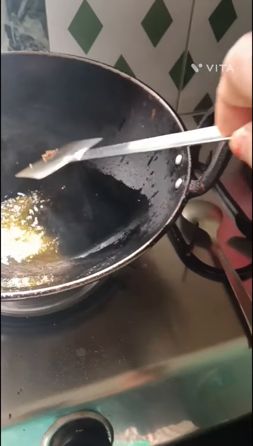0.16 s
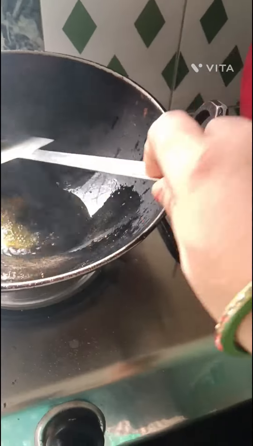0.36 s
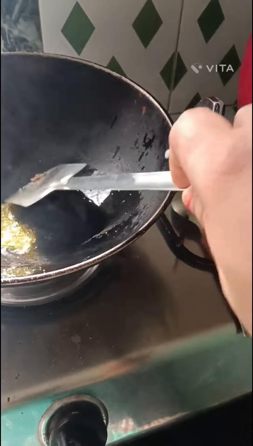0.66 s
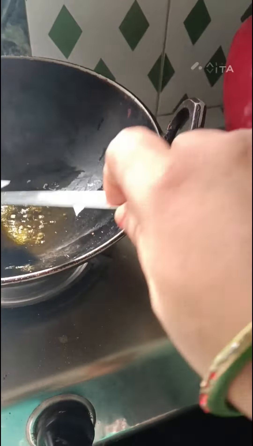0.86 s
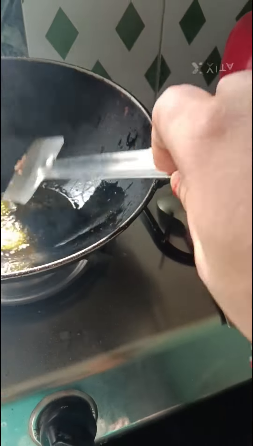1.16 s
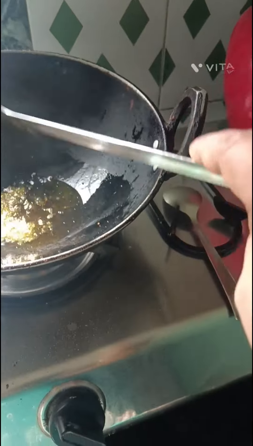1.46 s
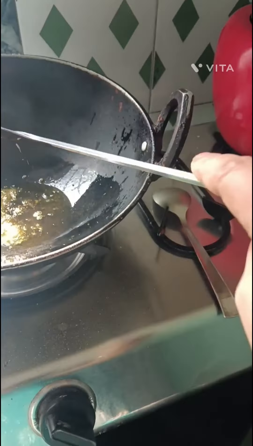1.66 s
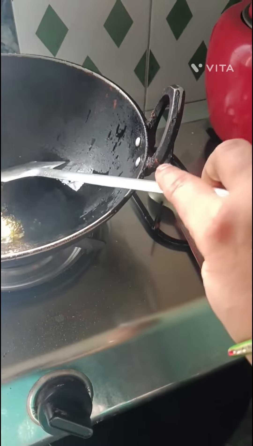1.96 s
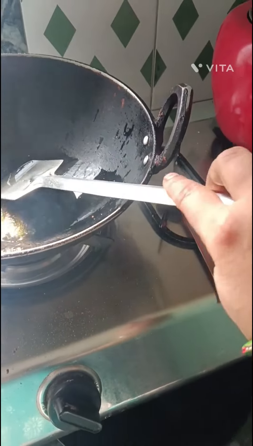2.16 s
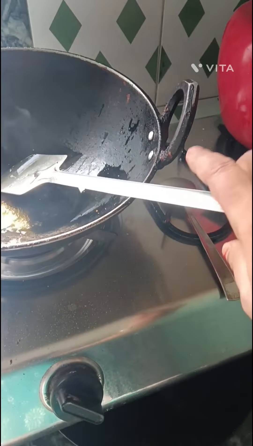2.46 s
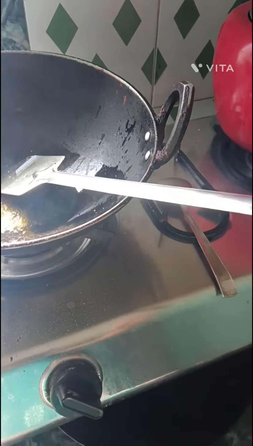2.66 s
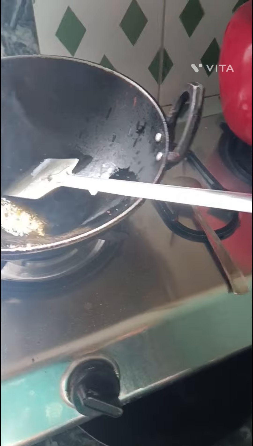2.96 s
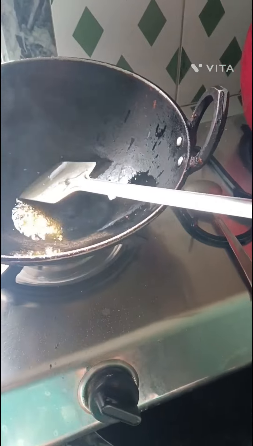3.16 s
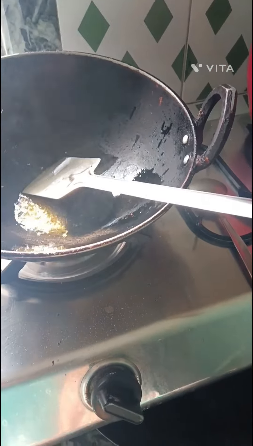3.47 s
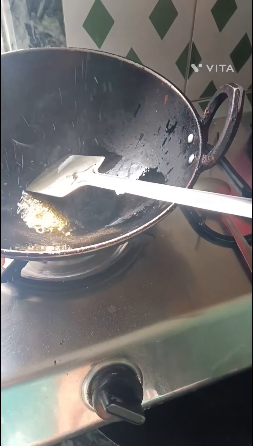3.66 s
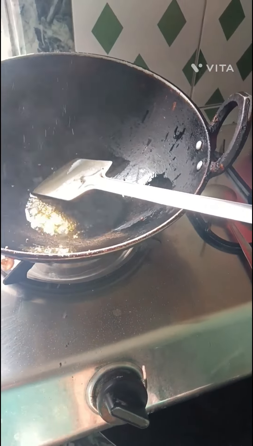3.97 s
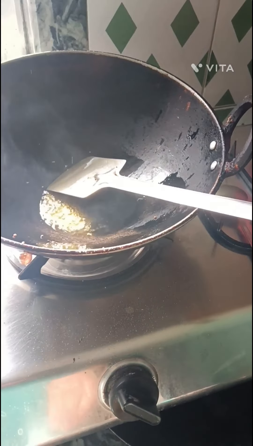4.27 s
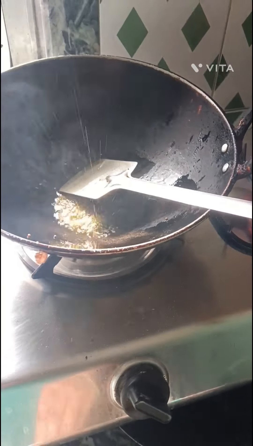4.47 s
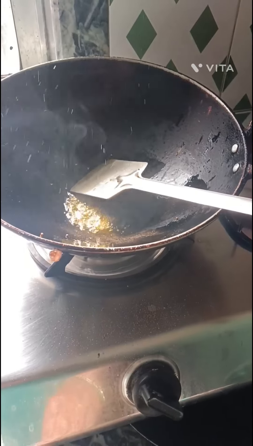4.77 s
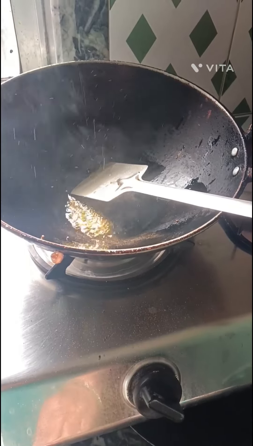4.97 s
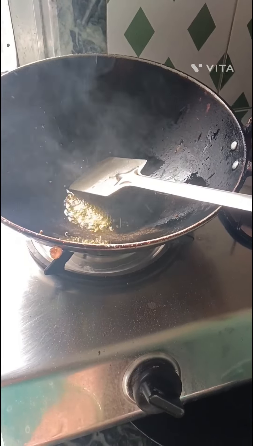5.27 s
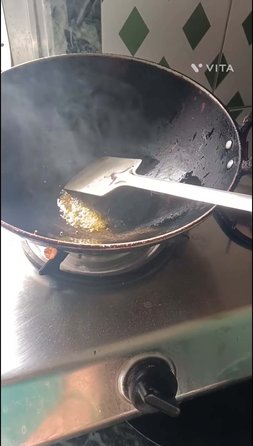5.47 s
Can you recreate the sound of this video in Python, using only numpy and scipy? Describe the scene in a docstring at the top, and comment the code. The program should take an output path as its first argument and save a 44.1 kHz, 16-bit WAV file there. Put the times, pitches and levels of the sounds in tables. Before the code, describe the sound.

A metal spatula knocks and scrapes in a pan, then seeds crackle ever more densely in hot oil with sharp pops and sizzle.

```python
"""In a tiled kitchen, seeds burst in hot oil in a steel pan: each pop is a damped bubble tone and a noise crack.
A spatula knocks, scrapes and squeals early on: noise through steel modes, and a wavering tone.
Later the pops crowd over a sizzle of clicks and small bubbles; the nearest puff air on a phone's right port.
A stove murmurs and rumbles as shaped noise; the tiles add echoes and a noise tail; gain control ducks after peaks."""
import sys
import numpy as np
from scipy import signal
from scipy.fft import rfft, irfft, next_fast_len
from scipy.io import wavfile
from scipy.ndimage import minimum_filter1d

SR = 44100
rng = np.random.default_rng(int(sys.argv[2]) if len(sys.argv) > 2 else 0)


def to_wav(s):
    """Save 16-bit WAV."""
    ch = np.atleast_2d(s).T  # columns
    pcm = np.round(np.clip(ch, -1, 1) * 32767)  # PCM
    wavfile.write(sys.argv[1], SR, pcm.astype(np.int16))


N = 247790

# bursting seeds: (time [s], bubble peak [dB], bubble pitch [Hz],
#                  crack peak [dB], crack tilt [dB/octave], crack life [ms], held to 0.3-6)
BURSTS = [(0.0357, -18, 3820, -27, -2, 2.2), (0.3331, -49, 1180, -14, 0.5, 0.54),
          (0.404, -10, 3120, -17.5, -17, 1.6), (0.5963, -62, 4730, -25.5, 6, 0.92),
          (0.9706, -30, 1330, -24, 22, 1.3), (1.27, -35, 1570, -42, 6, 1.9),
          (1.2829, -25.5, 1590, -27.5, -8, 2.4), (1.7557, -29, 1620, -16.5, 5, 0.6),
          (1.7633, -20.5, 1606, -14, -4, 1.5), (1.8116, -27, 3700, -16.5, 21, 1.3),
          (1.8379, -19.5, 2830, -17.5, 4, 6.8), (1.9303, -35, 4150, -26.5, 24, 1.2),
          (1.9426, -23, 4340, -25.5, -14, 1.2), (1.9603, -43, 4300, -23, 20, 0.82),
          (1.9833, -21.5, 2910, -25, -2, 2.7), (2.137, -37.5, 3180, -29, -1.5, 3.6),
          (2.18, -61, 4660, -29.5, -2, 0.63), (2.37, -17.5, 4200, -14.5, 4, 1.3),
          (2.4128, -19, 1580, -14, -0.5, 1.1), (2.43, -18.5, 2380, -15, 4.5, 2.7),
          (2.4949, -20, 2560, -19, 1, 1.3), (2.5035, -24, 3800, -25, -3, 0.85),
          (2.6691, -24.5, 1790, -30, -10, 1.4), (2.7285, -37, 1540, -14.5, 5, 1.6),
          (2.821, -19.5, 2750, -28, -6, 1.1), (2.8484, -25, 3670, -17, 1, 0.8),
          (2.9762, -24, 3340, -20, 7.5, 0.7), (3.0263, -53, 3800, -27, 5, 0.61),
          (3.0459, -26.5, 2680, -27, -19, 0.89), (3.1287, -9.5, 2370, -26.5, -18, 1.2),
          (3.3086, -11, 3970, -16.5, 0.5, 1.3), (3.3467, -13, 4620, -25, 0, 1),
          (3.3771, -15, 2500, -15, -2.5, 1.2), (3.3881, -10, 1655, -32, -3, 0.6),
          (3.487, -14, 2310, -19.5, -3.5, 2.3), (3.605, -19, 2940, -12, -4.5, 3.9),
          (3.6225, -7.5, 2940, -14, 0, 0.51), (3.7304, -16, 4600, -11, 20.5, 0.93),
          (3.783, -19.5, 1820, -15, 3, 0.6), (3.8146, -16, 3800, -10, 3.5, 6.7),
          (3.8231, -8.5, 2550, -29, 5, 6), (3.9462, -24, 2280, -13.5, -1, 3.1),
          (3.9627, -12.5, 2550, -32, 0, 1), (3.9745, -15, 4400, -13.5, -8, 2.3),
          (4.0235, -6, 1910, -10.5, -1.5, 1.9), (4.1043, -35, 4600, -4, 7.5, 1.3),
          (4.2087, -10, 2380, -15, 1, 1.2), (4.258, -42, 2580, -30, 3, 1.1),
          (4.2648, -27.5, 1310, -9.5, 15, 0.42), (4.2825, -16.5, 2820, -28, 4, 1),
          (4.3242, -11.5, 1950, -19, -16, 0.65), (4.3452, -24, 1600, -25, 4, 0.8),
          (4.3731, -15, 4350, -18, 5, 0.75), (4.413, -12, 4580, -18.5, -1, 1.9),
          (4.4323, -17, 2190, -21, 15, 0.84), (4.444, -47, 2200, -12, 36, 0.62),
          (4.4795, -20, 1290, -12, 10, 0.51), (4.4944, -44, 1710, -9, 3, 2.9),
          (4.55, -21, 2400, -14.5, 20, 1.8), (4.5866, -8.5, 2220, -11, -8.5, 3.2),
          (4.6122, -13, 2240, -14, 6, 0.8), (4.6388, -15, 3640, -13, -1, 3.4),
          (4.6461, -14.5, 2780, -25, 18, 0.77), (4.6502, -15, 3100, -27, 11, 4.9),
          (4.67, -21, 2550, -27, -9, 2), (4.6987, -25, 4590, -11.5, -5, 0.69),
          (4.7426, -19.5, 2280, -34, -5, 1), (4.7754, -20, 2090, -21.5, -11, 1.7),
          (4.8283, -32, 3100, -25, 7, 0.7), (4.8683, -28, 2040, -21, -1, 1.7),
          (4.9118, -35, 3850, -14, 16, 1.1), (4.9598, -10, 2610, -17.5, 3, 4.1),
          (5.0233, -16, 2180, -35, 0, 1.1), (5.043, -9.5, 2055, -12, -1.5, 3.8),
          (5.0669, -31, 2270, -15.5, -14, 1.5), (5.0703, -12.5, 2700, -14.5, 6, 1.9),
          (5.105, -9, 2290, -11.5, -6, 7.8), (5.1751, -9.5, 3050, -24, 2, 0.9),
          (5.2177, -15, 4660, -21.5, 4, 1.2), (5.2436, -13, 1720, -19.5, 13, 1),
          (5.267, -12, 2590, -24, -31, 1.5), (5.2702, -16.5, 2100, -17.5, -16, 2),
          (5.3198, -25.5, 1250, -16.5, 6.5, 3.6), (5.3607, -11.5, 2330, -18.5, 0, 5.7),
          (5.3682, -11, 1920, -12.5, 5, 1.7), (5.4034, -10.5, 2450, -15.5, -8, 2.3),
          (5.41, -30, 4000, -12, 6, 1.4), (5.4539, -16, 2140, -12.5, -9, 0.63),
          (5.5255, -21, 4950, -19.5, -2, 1.1), (5.5376, -32, 4500, -30, -5, 1.3),
          (5.5821, -9, 2320, -10, 1, 1)]
# spatula pressed along the pan: (time [s], hold [s], body level [dB], bass re body [dB], treble re body [dB],
#                                 four lowest modes [Hz] x 4, squeal level [dB], squeal glide [Hz/s])
STROKES = [(0.205, 0.069, -39.5, -12, -1.5, 493, 833, 1227, 2050, -38, -100),
           (0.85, 0.069, -61, -1, 9, 447, 800, 874, 2220, -51.5, 1802),
           (0.966, 0.06, -44, -19, 1.5, 606, 798, 1299, 2290, -54, 600),
           (1.453, 0.05, -39, -14.5, 2, 393, 787, 1394, 2224, -69, 298),
           (2.428, 0.02, -43, -12, 9, 616, 814, 1280, 1740, -58, 50),
           (2.592, 0.058, -52, -11, 2, 503, 784, 1259, 1610, -47.5, 46),
           (2.809, 0.0084, -42.5, -10, -13, 708, 902, 1282, 1970, -69, -500),
           (3.37, 0.1, -55, -9, 10, 710, 848, 1316, 1890, -78, 50)]


def amp(db):
    """dB to gain."""
    return 10 ** (np.asarray(db) / 20)


def unit(x):
    """Scales to rms 1."""
    return x / np.sqrt(np.mean(x ** 2) + 1e-20)


def along(points, hz):
    """Interpolates (Hz, value) points on a log axis."""
    f, v = np.transpose(points)
    return np.interp(np.log(hz + 1), np.log(f + 1), v)


def curves(rows):
    """One value per sample for each column after the time."""
    s, *cols = np.transpose(rows)
    return [np.interp(np.arange(N) / SR, s, c) for c in cols]


def filtered(x, response):
    """Filters x by a complex response of frequency."""
    m = next_fast_len(N + SR // 2)
    return irfft(rfft(x, m) * response(np.fft.rfftfreq(m, 1 / SR)), m)[..., :N]


def scatter(s, shapes):
    """Adds one short waveform per row at its time."""
    at = np.round(np.asarray(s) * SR).astype(int)[:, None] + np.arange(shapes.shape[1])
    return np.bincount(at.ravel(), shapes.ravel(), N + SR)[:N]


def shape(start, hold, rise_db_s, fade_db_s):
    """Gain that rises to start, holds and fades, in straight dB lines."""
    t = np.arange(N) / SR
    rise_db = -rise_db_s * np.maximum(start - t, 0)
    fade_db = -fade_db_s * np.maximum(t - start - hold, 0)
    return amp(rise_db + fade_db)


def bubbles(s, db, hz, cycles, rise):
    """Damped tones glide up as each cavity closes; a small cavity radiates little below its pitch."""
    turn = np.arange(512) / SR * hz[:, None]
    swell = (1 - np.exp(-turn / .3)) * np.exp(-turn / np.clip(cycles, .4, 6))
    below = np.fft.rfftfreq(512, 1 / SR) / np.maximum(0.68 * hz[:, None], 1200)
    high_pass = (below ** 2 / (1 - below ** 2 + 1j * below / 0.96)) ** 3
    tones = swell * np.sin(2 * np.pi * turn * (1 + rise * turn))
    tones = irfft(rfft(tones) * high_pass)
    tones /= abs(tones).max(axis=1, keepdims=True)
    return scatter(s, amp(db)[:, None] * tones)


def cavities():
    """Each burst leaves a ringing cavity in the oil; lower ones ring for more cycles."""
    s, db, hz, *_ = np.transpose(BURSTS)
    cycles = 1.74 * (2400 / hz[:, None]) ** 0.47
    return bubbles(s, db, hz, cycles, rise=0.0021)


def cracks():
    """Steam splits each husk: a single tick, or a short spit when the jet lasts."""
    # crack spectrum: (frequency [Hz], relative level [dB])
    crack_colour = [(1760, -64), (3000, 12), (4020, 16), (5350, 23.5), (6440, 16.5), (8440, 23.5),
                    (9530, 11), (10300, 12.5), (15500, -16.5), (16200, -2), (16500, -50)]
    lead, tick = 22, 2.37  # samples of room for the filter's pre-ring; first split re spit's starting rms
    s, _, _, db, tilt_db, life_ms = np.transpose(BURSTS)
    t = np.arange(1024) / SR
    spit_fade = np.exp(-1000 * t / np.clip(life_ms, .3, 6)[:, None])
    burst = rng.standard_normal((len(s), len(t))) * spit_fade
    burst[:, 0] = tick
    f = np.fft.rfftfreq(len(t), 1 / SR)
    colour_db = along(crack_colour, f) + tilt_db[:, None] * np.log2(np.maximum(f, 3000) / 7000)
    burst = irfft(rfft(np.roll(burst, lead, axis=1)) * amp(colour_db))
    burst /= abs(burst).max(axis=1, keepdims=True)
    return scatter(s - lead / SR, amp(db)[:, None] * burst)


def sizzle():
    """Countless small bubbles: a fine fizz of clicks, and larger ones with a pitch."""
    # (time [s], fizz rms [dB], larger bubbles re fizz [dB])
    sizzle_levels = [(0.0, -46.5, -14), (0.27, -83, -7), (0.34, -33.5, -20.5), (0.61, -62, -11),
                     (0.97, -50.5, -17), (1.33, -65, -16), (1.45, -51, -15), (1.75, -63, -8),
                     (1.96, -48, -8.5), (2.19, -59, -8.5), (2.93, -46, -8), (3.13, -52, -10),
                     (3.38, -52, 15.5), (3.69, -50.5, -3), (3.82, -44, -3.5), (4.55, -40, 3.5),
                     (4.8, -49.5, 6), (5.09, -44, 7), (5.62, -48, 4.5)]
    # fizz spectrum: (frequency [Hz], relative level [dB])
    fizz_colour = [(2650, -46), (4500, -41), (5380, -9), (6620, -19), (7580, 5), (8930, -4), (10600, -4.5),
                   (16000, -33), (16500, -54)]
    fizz_db, large_db = curves(sizzle_levels)
    clicks = rng.standard_normal(N) * amp(3 * rng.exponential(size=N))
    fizz = unit(filtered(clicks, lambda f: amp(along(fizz_colour, f))))
    draw = rng.random((2500, 3))
    hz = 1500 * 3.01 ** draw[:, 1]
    size_db = -3.5 * np.log(draw[:, 2] + .003)  # many weak, few strong
    large = bubbles(draw[:, 0] * N / SR, size_db, hz, cycles=1.6, rise=.012)
    return amp(fizz_db) * (fizz + amp(large_db) * unit(large))


def steel_ring(x, grip_hz, part, lo_hz, hi_hz):
    """Pan and spatula modes of one band as resonators, over a weaker hiss between them."""
    # (frequency [Hz], 0 where the grip sets it; width [Hz]; gain [dB])
    steel_modes = [(0, 34.6, -6.5), (0, 15.5, 0), (0, 31.4, 1.5), (0, 60, -6), (2710, 45, -22),
                   (3058, 77, -5), (4160, 91, -15), (5170, 160, -7.5), (5540, 53, -4), (5820, 66, -7.5),
                   (6580, 63, -7.5), (7500, 140, -7), (7800, 73, -9), (7830, 130, -10), (8860, 48, -2)]
    # hiss gain [dB]: body, bass, treble
    hiss_db = (-19, -27.5, -18)
    mode_hz = list(grip_hz) + [m[0] for m in steel_modes[len(grip_hz):]]
    modes = [(c, w, db) for c, (_, w, db) in zip(mode_hz, steel_modes) if lo_hz < c < hi_hz]

    def response(f):
        total = amp(hiss_db[part]) / (1 + (lo_hz / (f + 1)) ** 4) / (1 + (f / hi_hz) ** 12)
        for k, (c, w, db) in enumerate(modes):
            resonance = 1j * f * w / (c * c - f * f + 1j * f * w)
            total = total + (-1) ** k * amp(db) * resonance
        return total

    return filtered(x, response)


def spatula():
    """Knocks, the skids after them and gritty drags drive the same steel modes in three bands."""
    # landings: (time [s], level [dB], skid bass re body [dB], skid treble re body [dB],
    #            four lowest modes [Hz] x 4)
    landings = [(0.1099, -17.5, 3.5, 2.8, 466, 939, 1310, 1970),
                (0.7912, -28.5, 2, 0.45, 565, 855, 1290, 2300),
                (1.3443, -21.5, 0.5, 10.4, 385, 780, 1282, 2195)]
    # gain [dB] of body, bass, treble: narrow modes pass little of a short blow
    blow_gain_db = (28.5, 8, 29)
    bands_hz = [(1000, 4600), (300, 1000), (4600, 10500)]  # body, bass, treble
    skid_db, skid_fade_db_s = -14.5, (482, 292, 303)
    drag_rise_db_s, drag_fade_db_s = 343, (420, 200, 248)

    def gritty(grip_hz, band):
        grit = rng.standard_normal(N) * amp(2.5 * rng.exponential(size=N))
        return unit(steel_ring(grit, grip_hz, *band))

    out, t = np.zeros(N), np.arange(900) / SR
    for part, (lo_hz, hi_hz) in enumerate(bands_hz):
        band = part, lo_hz, hi_hz
        for s, db, bass_db, treble_db, *grip_hz in landings:
            part_db = db + (0, bass_db, treble_db)[part]
            chatter = rng.standard_normal((1, len(t))) * np.exp(-t / .001)  # edge chatters as it lands
            out += amp(db + blow_gain_db[part]) * steel_ring(scatter([s], chatter), grip_hz, *band)
            skid = (np.arange(N) >= s * SR) * shape(s, 0, 0, skid_fade_db_s[part])
            out += amp(part_db + skid_db) * skid * gritty(grip_hz, band)
        for s, hold, db, bass_db, treble_db, *grip_hz, _, _ in STROKES:
            part_db = db + (0, bass_db, treble_db)[part]
            pressure = shape(s, hold, drag_rise_db_s, drag_fade_db_s[part])
            out += amp(part_db) * pressure * gritty(grip_hz, band)
    return out


def squeal():
    """Stick and slip keeps a drag's third mode singing unsteadily; its pitch glides steadily up or down."""
    out, t = np.zeros(N), np.arange(N) / SR
    for s, hold, *_, hz, _, db, glide_hz_s in STROKES:
        unsteady = filtered(rng.standard_normal((2, N)), lambda f: 1 / (1 + (f / 25) ** 2))
        phase = 2 * np.pi * (hz + glide_hz_s * (t - s) / 2) * (t - s)
        tone = (0.4 + unit(unsteady[0])) * np.cos(phase) + unit(unsteady[1]) * np.sin(phase)
        out += amp(db) * shape(s, hold, rise_db_s=354, fade_db_s=375) * unit(tone)
    return out


def puffs():
    """A snap, then a sudden push on the membrane that leaks away; the bass cut makes it swing back."""
    # air on the right port: (time [s], push level [dB], snap level [dB])
    air_bursts = [(.3333, -3, -51), (4.1047, -9, -18), (4.1258, -10, -12), (4.265, -11.5, -29),
                  (4.4438, -10, -3), (4.4803, -8.5, -0.5), (4.4885, -8, -10), (4.4952, -2, 1),
                  (4.9202, -7, -12.5), (5.32, -6, -5)]
    s, db, snap_db = np.transpose(air_bursts)
    t = np.arange(900) / SR
    push = scatter(s, -amp(db)[:, None] * np.exp(-t / 0.0013) * (1 - np.exp(-t / .00005)))
    click = np.exp(-t / 0.00023) * np.cos(2 * np.pi * 2600 * t)
    snap = scatter(s - .0002, amp(snap_db)[:, None] * click)
    return filtered(push + snap, lambda f: -f * f / (85 ** 2 - f * f + 1j * f * 90))


def stove():
    """Burner and street: a low noise murmur, mostly separate on each port, and a shared wavering rumble."""
    # murmur spectrum: (frequency [Hz], relative level [dB])
    murmur_colour = [(18, -40), (30, -10), (121, -5), (674, -10.5), (778, -9), (1730, -13.5), (1910, -75),
                     (4000, -118), (5200, -65), (8800, -120)]
    # (time [s], rumble level before flutter [dB])
    rumble_levels = [(0.0, -74), (0.19, -57), (0.28, -79), (0.66, -66), (0.76, -77), (0.88, -59),
                     (1.26, -65.5), (1.85, -70.5), (2.43, -82), (2.63, -60), (2.8, -79.5), (3.4, -65),
                     (3.85, -78), (4.0, -54.5), (5.0, -61.5), (5.62, -75)]
    flutter_rms_db, flutter_hz = 4, 4.8
    common, left, right, deep, chance = rng.standard_normal((5, N))
    flutter = filtered(chance, lambda f: 1 / (1 + (f / flutter_hz) ** 4))
    rumble_db = curves(rumble_levels)[0] + flutter_rms_db * unit(flutter)
    murmur = filtered(common + 2.8 * np.array([left, right]), lambda f: amp(along(murmur_colour, f)))
    rumble = filtered(deep, lambda f: sum(f * 14 / abs(c * c - f * f + 1j * f * 14) for c in (60, 108)))
    return amp(-69.5) * unit(murmur) + amp(rumble_db) * unit(rumble)


def kitchen(x, wet_db):
    """Hard tiles: clear echoes, then a diffuse noise tail that dies faster in the top."""
    # (frequency [Hz], t60 [s])
    decay_t60 = [(400, 0.14), (2600, 0.34), (7000, 0.33), (11000, 0.18), (13000, 0.1), (16000, 0.07)]
    # (left delay [s], right delay [s])
    echo_delays = [(.0085, .0082), (.0108, .0103), (.016, .0166), (.0198, .0186)]
    # (left level [dB], right level [dB])
    echo_levels = [(-9, -5), (-10, -15.5), (-9, -22), (-24, -14)]
    step = SR // 3  # the tail is drawn anew every third of a second
    out = np.zeros((2, N + SR))
    for start in range(0, N, step):
        hz, t, z = signal.stft(rng.standard_normal((2, SR // 2)), SR, nperseg=256)
        decay = amp(-60 * t / along(decay_t60, hz)[:, None])
        tail = signal.istft(z * decay, SR, nperseg=256)[1]
        build_up = 1 - np.exp(-np.arange(tail.shape[1]) / (.006 * SR))
        tail *= amp(wet_db) / np.linalg.norm(tail[0]) * build_up
        tail[0] *= amp(1.5)  # the left port faces the room
        for (left_s, right_s), (left_db, right_db) in zip(echo_delays, echo_levels):
            tail[0, round(left_s * SR)] += amp(left_db)
            tail[1, round(right_s * SR)] += amp(right_db)
        wet = signal.fftconvolve(x[None, start:start + step], tail, axes=1)
        out[:, start:start + wet.shape[1]] += wet
    return out[:, :N]


def heard(x, left_db, wet_db, late_samples):
    """The phone's body shades the left port; longer waves creep round it and arrive late."""
    late = np.pad(x, (late_samples, 0))[:N]
    return np.array([amp(left_db) * late, x]) + kitchen(x, wet_db)


def scene():
    """All sources at the two ports; the tiles return more of the cracks' treble."""
    sound = heard(cavities(), left_db=-9, wet_db=-2.5, late_samples=14)
    sound += heard(cracks(), left_db=-5.5, wet_db=2.2, late_samples=0)
    sound += heard(sizzle(), left_db=-6.5, wet_db=-3.5, late_samples=0)
    sound += heard(spatula() + squeal(), left_db=-6.0, wet_db=-3.5, late_samples=7)
    sound += stove()
    sound[1] += puffs()
    return sound


def record(dry):
    """Gain control ducks both ports after peaks and recovers slowly; the top is shelved, then cut."""
    threshold_db, release_s, top_hz = -9, .06, 16800
    peak_db = 20 * np.log10(abs(dry).max(axis=0) + 1e-9)
    over_db = np.maximum(peak_db - threshold_db, 0)
    held_db = -minimum_filter1d(-np.pad(over_db, (150, 0)), size=221)  # 5 ms peak hold, slightly late
    release = np.exp(-np.arange(SR // 2) / (release_s * SR))
    duck = signal.fftconvolve(held_db, release)[:N]

    def band_limit(hz):
        shelf_db = -14 * np.clip((hz - 15600) / 500, 0, 1)
        return amp(shelf_db) * (hz < top_hz)

    return filtered(dry * amp(-.004 * duck), band_limit)


dry = scene()
out = record(dry)
to_wav(out)
```